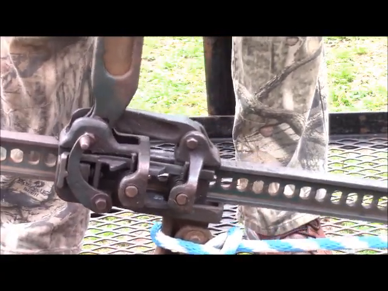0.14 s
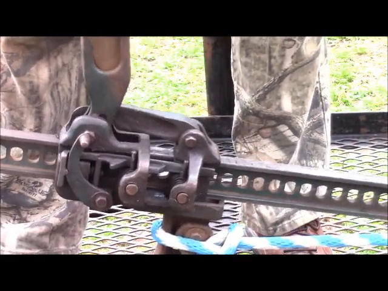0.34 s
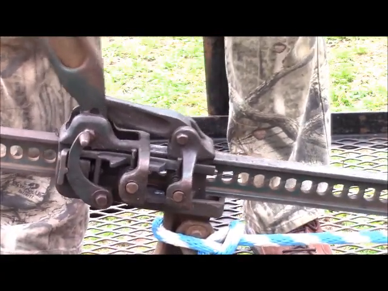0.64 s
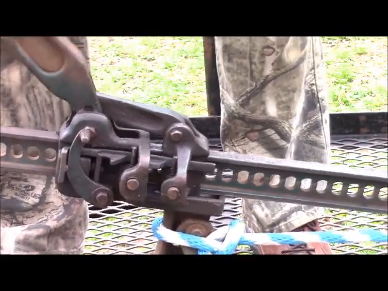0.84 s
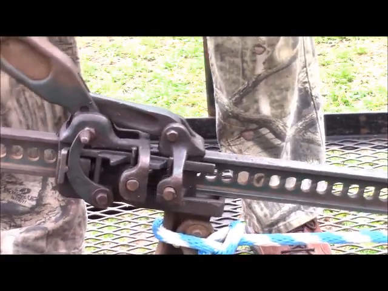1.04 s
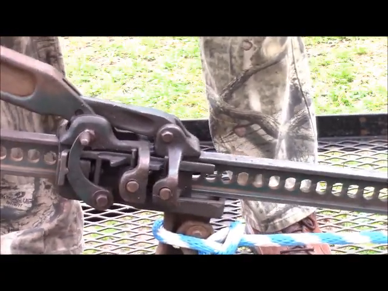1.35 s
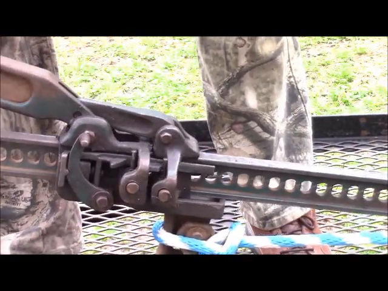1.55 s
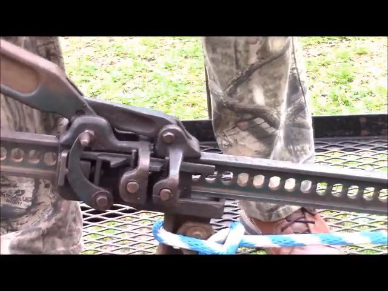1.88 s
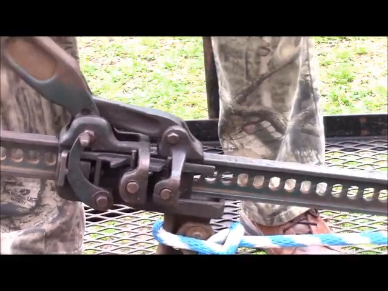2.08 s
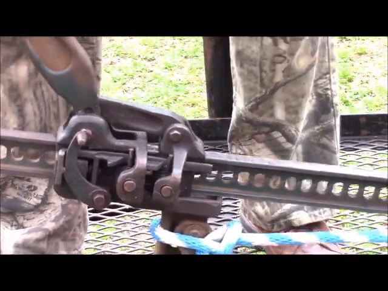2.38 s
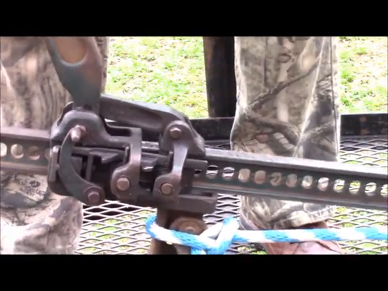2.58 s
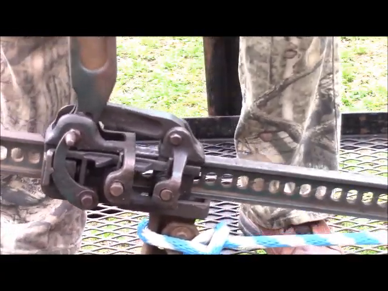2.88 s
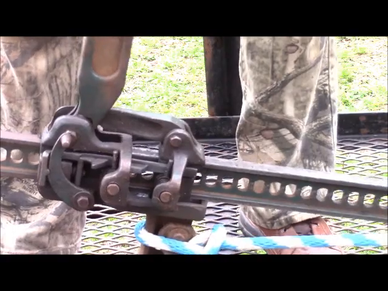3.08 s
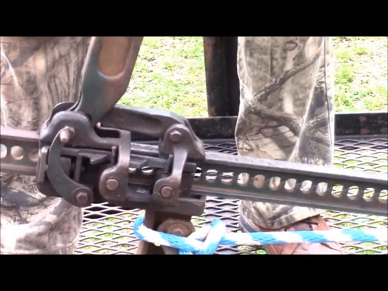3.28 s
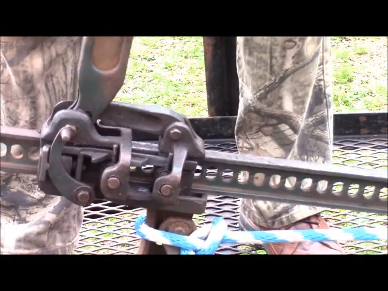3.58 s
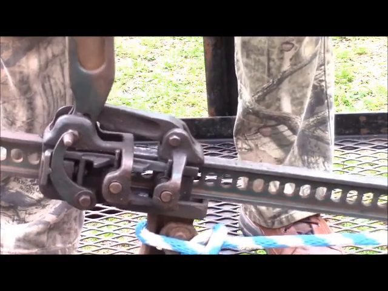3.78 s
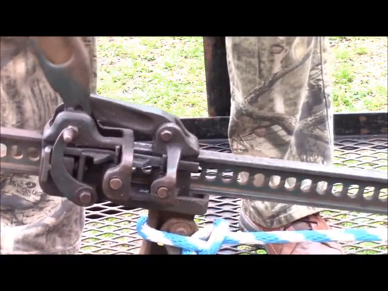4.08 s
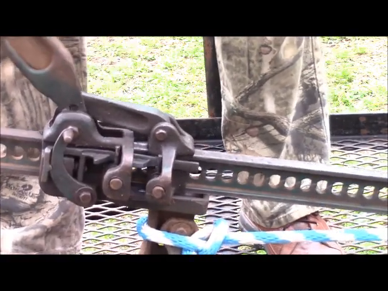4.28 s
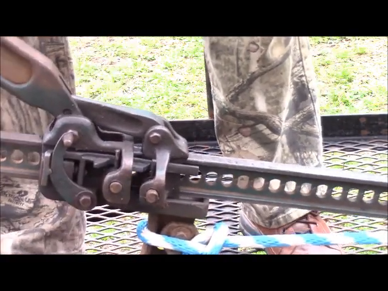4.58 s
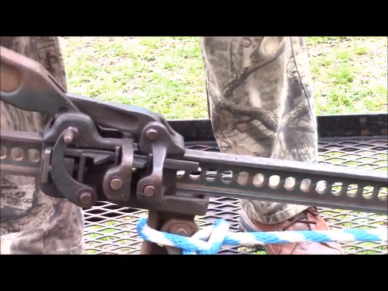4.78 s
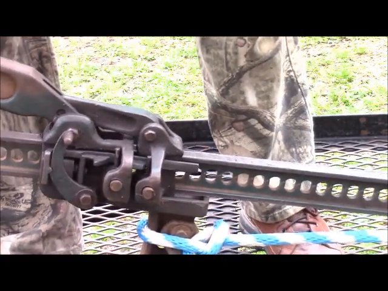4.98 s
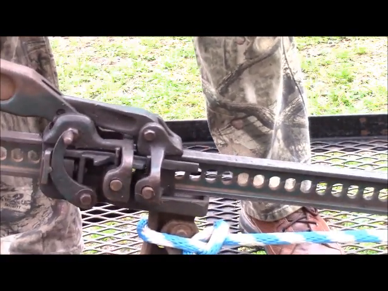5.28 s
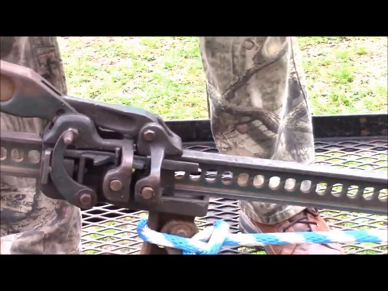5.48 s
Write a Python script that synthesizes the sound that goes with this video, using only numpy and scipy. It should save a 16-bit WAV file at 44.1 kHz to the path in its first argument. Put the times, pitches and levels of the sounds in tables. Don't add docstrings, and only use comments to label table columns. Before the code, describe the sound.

Loose cast-iron parts tick and clank as a lever is worked, close to the microphone. Three times a spring pin slams home with a tiny high ping, a steely clatter and a brief ringing bar, far louder than everything else. Between them are double clunks, soft rubbing, small chirps and low trailer thuds, over a very quiet open yard with distant air and a wavering engine hum.

```python
import sys
import numpy as np
from scipy import signal
from scipy.fft import rfft, irfft
from scipy.io import wavfile
from scipy.ndimage import uniform_filter1d

SR = 44100
rng = np.random.default_rng(int(sys.argv[2]) if len(sys.argv) > 2 else 0)


def log_audio(samples):
    frames = np.atleast_2d(samples).T
    limited = np.clip(frames, -1, 1)
    pcm = np.round(limited * 32767).astype(np.int16)
    wavfile.write(sys.argv[1], SR, pcm)


def ratio_of_db(decibels):
    return 10 ** (np.asarray(decibels, float) / 20)


N = 248724

# pitch_hz, density_db per Hz
YARD_COLOUR = [(16, -46.5), (80, -21), (135, -4), (393, -14.5), (1000, -18.5), (2000, -25), (14500, -43.5),
               (16500, -70)]
# pitch_hz, width_hz, level_db
ENGINE_LINES = [(134, 10, -68), (190, 13, -70.5), (261, 8.8, -77.5)]
# time_s, level_db
ENGINE_SWELL = [(0, -69), (.8, -62.5), (1.599, -74), (1.95, -69), (2.8, -74), (3.2, -66), (3.5, -73),
                (4.38, -68), (4.8, -75), (5.64, -74)]
# pitch_hz, side_re_mid_db
SIDE_COLOUR = [(25, -5.5), (60, -27), (150, -30.5), (400, -18), (3000, -15), (7000, -20), (13000, -21),
               (14500, -40.5)]

# start_s, level_db, t60_s
HEAVES = [
    (1.33, -48, 0.45),
    (3.015, -52, .1),
    (4.35, -51, 0.5),
]
# start_s, level_db
THUDS = [(0.853, -50.5), (1.25, -44), (1.337, -34), (1.459, -45.5), (1.89, -49), (1.948, -61),
         (2.225, -46.5), (3.017, -60), (3.718, -53), (4.35, -46.5), (4.4, -43.5), (4.439, -48)]
# pitch_hz, level_db, t60_s
DECK_MODES = [(61.95, -19.5, 0.32), (112, -6, 0.26), (148.3, -3, 0.29), (204, 2.5, 0.2), (223.4, -2, 0.31),
              (261, -5.5, 0.15), (331, -13, .4), (462, -8, 0.4), (560, -13.5, 0.17)]

# time_s, level_db
STRAIN = [(0, -63.5), (.35, -62.5), (.5, -64), (1.0, -61), (1.24, -60), (1.6, -65.5), (1.84, -54.5),
          (2.1, -59), (2.55, -61), (2.89, -66), (3.05, -65), (3.19, -56), (3.31, -65), (4.15, -64.5),
          (4.44, -55), (4.6, -68), (4.77, -57), (5.04, -65.5)]
# middle_s, length_s, level_db
SLIDES = [(.72, 0.42, -72.5), (1.0, 0.34, -74), (1.748, .16, -70.5), (1.828, 0.085, -69),
          (1.865, 0.073, -72), (1.902, 0.057, -65), (1.946, 0.05, -67), (2.02, .2, -74), (3.38, .25, -75),
          (2.548, .05, -65), (2.58, 0.048, -62), (2.62, 0.14, -68.5), (2.686, .05, -71.5),
          (3.17, .35, -70.5), (4.3, 1, -79), (4.95, 0.42, -73.5)]
# pitch_hz, density_db per Hz
RUB_COLOUR = [(120, -32), (200, 2.5), (500, -1.5), (602, -8), (1140, -10.5), (3500, -28), (4550, -53.5),
              (7700, -120)]
# pitch_hz, density_db per Hz
SCRAPE_COLOUR = [(1470, -29), (2500, -3), (3480, -4), (3800, -4.5), (4910, -10.5), (5530, -6.5),
                 (6830, -5.5), (15000, -27.5)]
# start_s, level_db, pitch_hz, glide_hz_per_s, t60_s
CHIRPS = [(4.355, -51, 1700, -1900, .4), (4.342, -63, 9100, 0, .09), (4.345, -62, 4300, 0, .1),
          (4.398, -59, 3650, 0, .05), (4.402, -63, 6400, 0, .11), (4.412, -61, 8300, 0, .1),
          (5.345, -60, 2900, 0, .04), (2.42, -62, 5250, 0, .2), (.987, -43, 1590, 0, .3),
          (.987, -51, 2300, 0, .18), (4.56, -53, 3050, 0, .2), (4.56, -52, 5300, 0, .13)]
# start_s, level_db, pitch_hz, glide_hz_per_s, t60_s
RAIL_HUMS = [(.99, -52, 441, 0, 0.83), (1.0, -52, 268, 0, 0.86), (3.69, -46.5, 268, 0.0083, 0.74),
             (4.562, -46.5, 436, 0, 0.6), (4.57, -54.5, 776, 0, 0.65), (2.23, -49.5, 268, 0, 0.41),
             (3.045, -47.5, 268, 0, 0.82), (3.06, -50, 429, 0, 0.8), (4.56, -49, 1331, 0, 0.24)]

# start_s, level_db, treble_re_body_db, body_hz
KNOCKS = [(0.169, -40.5, -9, 835), (0.657, -43.5, -22, 1410), (0.682, -42.5, -3, 2400),
          (0.695, -41, -6, 1700), (0.986, -31, -6.5, 1450), (1.24, -45, -20.5, 800),
          (1.332, -31.5, -35, 1487), (2.401, -38, -30.5, 2160), (3.677, -40, -10, 873),
          (3.714, -34.5, -20.5, 1496), (4.142, -46, -4.5, 1493), (4.559, -31.5, -5.5, 1420),
          (4.686, -47.5, -24, 1300)]
# start_s, level_db, treble_re_body_db, body_hz
CLUNKS = [(0.223, -40.5, -21, 1200), (1.698, -35, -12, 1200), (2.170, -35.5, -30.5, 1050),
          (2.212, -35.5, -23, 1003), (2.412, -42, 3, 2280), (4.341, -38, -19, 1530),
          (4.399, -46, -4.5, 900)]
# start_s, level_db, treble_re_body_db, body_hz
TICKS = [(0.194, -45, -23, 515), (0.641, -54, 1, 1340), (0.664, -42, 1, 1290), (0.834, -47.5, -26, 870),
         (0.93, -50, -22, 1300), (1.223, -41.5, -19, 566), (1.685, -44.5, -2.5, 2450),
         (1.894, -51, -3, 564), (1.938, -54, -2, 729), (2.443, -48, 0, 1500), (4.095, -47.5, -33, 1305),
         (4.116, -45, -19.5, 1200), (4.124, -51, -6, 1135), (4.258, -48, -17, 990), (5.345, -63, -21, 540),
         (5.552, -46, -30.5, 1520)]
# start_s, level_db, treble_re_body_db, body_hz
TAPS = [(1.2795, -39, -5, 3000), (1.670, -41, -24, 1100), (1.6735, -38, -30, 1200),
        (2.1795, -35, -34, 1100), (3.0095, -39, -12, 2900)]
# events, bass_re_body_db, damping_t60_s
KNOCK_KINDS = [(KNOCKS, -7.5, 0.72), (CLUNKS, -27, 0.34), (TICKS, -11.5, 0.12), (TAPS, -20, 0.083)]
# pitch_hz, level_db, t60_s
LINKAGE_MODES = [(268, -9.5, 8.6), (350, -18, 0.72), (438.4, -3, 0.34), (767, -10, 0.47), (1200, -13, 0.2),
                 (1324, -7, 0.16), (1600, -7, 0.12), (1645, -14, 0.35), (1857, -14, 0.047),
                 (2130, -4.5, 0.078), (2340, -17, 0.38), (2907, -18, 0.14), (3480, -20.5, 0.12),
                 (5110, -20, 0.12)]

# start_s, level_db, pitch_hz, t60_s
LONE_MODES = [(1.2795, -41, 3900, .015), (1.2795, -45, 5600, .015), (1.2893, -25, 3500, .014),
              (1.2935, -37, 3510, .05), (1.2935, -46, 13130, .04), (1.296, -31, 7500, .025),
              (1.2995, -31, 1700, .05), (1.311, -35, 2170, .04), (1.331, -34, 1500, .03),
              (3.0235, -21, 2300, .02), (3.0235, -22, 3200, .02), (3.0235, -24, 4700, .016),
              (3.0235, -26, 6000, .016), (3.0235, -29, 13100, .016), (3.029, -30, 6900, .05),
              (4.7836, -34, 3200, .013), (4.7855, -28, 4300, .02), (4.788, -32, 7100, .035),
              (4.792, -34, 800, .25), (4.795, -34, 5300, .05),
              (.2235, -42, 1800, .03), (.5, -66, 8800, .012), (.657, -45, 1250, .04),
                 (.664, -47, 5200, .02), (.664, -50, 3500, .02), (.664, -50, 7300, .02),
                 (.9858, -34, 1310, .035), (.9858, -35, 2290, .03), (.9858, -41, 3450, .03),
                 (.991, -36, 1620, .1), (.991, -40, 770, .1), (1.698, -38, 914, .03),
                 (1.698, -40, 1850, .04), (1.704, -42, 2200, .04), (1.882, -58, 6330, .03),
                 (1.9383, -56, 6200, .03), (2.171, -47, 2870, .065), (2.1712, -32, 1060, .014),
                 (2.1797, -37, 1600, .03), (2.2085, -42, 1550, .025), (2.2085, -58, 3250, .02),
                 (2.21, -55, 4050, .02), (2.224, -57, 3200, .02), (2.234, -49, 1650, .08),
                 (2.4433, -58, 14800, .005), (2.4433, -56, 9500, .005), (2.4433, -53, 3000, .05),
                 (3.677, -48, 2200, .04), (3.714, -37, 1233, .055), (3.714, -40, 1577, .065),
                 (3.714, -38, 1873, .06), (3.714, -49, 2842, .04), (3.714, -49, 3289, .04),
                 (3.712, -63, 8600, .025), (4.117, -48, 1200, .05), (4.1237, -55, 7400, .01),
                 (4.1421, -49, 3950, .02), (4.1421, -50, 2870, .03), (4.267, -57, 3530, .02),
                 (4.3435, -37, 1550, .025), (4.345, -52, 4200, .05), (4.361, -43, 1680, .04),
                 (4.412, -48, 480, .09), (4.418, -42, 210, .25), (4.5595, -39, 1350, .08),
                 (4.5595, -38, 1650, .09), (4.5595, -40, 1900, .07), (4.5595, -45, 3070, .08),
                 (4.694, -50, 1650, .06),
              (4.79, -63, 5475, 1.1), (4.79, -63, 3100, 1.3), (4.79, -62, 2121, .6), (4.80, -48, 267, .6),
           (4.86, -62, 8800, .1), (3.03, -58, 11750, .4), (3.03, -54, 12900, .15), (3.03, -59, 7050, .5),
           (3.03, -62, 8400, .4), (3.04, -45, 262, .6), (3.57, -66, 3080, .15), (1.30, -41, 5450, .1),
           (1.3, -46, 1633, .2), (1.339, -33, 230, .12), (1.339, -36, 480, .05), (1.345, -42, 110, .35),
           (4.36, -47, 105, .4),
              (.1695, -46, 2400, .015), (.189, -61, 5300, .015), (.1952, -39, 600, .02),
          (.2235, -40, 1050, .04), (.2215, -56, 2900, .015), (.231, -59, 3150, .03), (1.379, -41, 230, .2),
          (4.41, -45, 150, .25), (2.401, -54, 7100, .015), (3.7135, -38, 1000, .03),
          (3.7145, -47, 3600, .015), (3.6765, -48, 7000, .012), (4.095, -48, 1200, .04),
          (4.1145, -53, 2600, .015), (4.123, -50, 1200, .03), (4.1237, -56, 6200, .012),
          (4.148, -57, 6800, .04), (3.7145, -48, 4900, .012), (3.6765, -51, 8400, .012),
          (5.553, -52, 1550, .04), (5.553, -55, 2300, .03), (4.7835, -22, 7300, .01)]

# start_s, level_db, pitch_hz, t60_s
PINGS = [(1.2878, -18, 8940, 0.007), (1.2892, -5, 7670, 0.0048), (1.2908, -15, 7900, 0.008),
         (1.29, -18, 6400, .012), (2.4136, -32.5, 8080, 0.0045), (3.0201, -35.5, 8930, 0.008),
         (3.024, -9.5, 7100, 0.01), (3.0238, -10.5, 8400, 0.0095), (3.024, -14.5, 11720, 0.01472),
         (3.0234, -5, 8204, 0.004), (3.031, -20.5, 8100, 0.008), (4.7817, -19.5, 8700, 0.007),
         (4.7835, -3, 7900, 0.0038), (4.7851, -13.5, 8500, 0.009)]
# pitch_ratio, level_db
PIN_OVERTONES = [(.43, -28.5), (.72, -23.5), (1.12, -11), (1.361, -26), (1.62, -28), (1.899, -32.5)]
# start_s, clatter_db, ringing_db
SNAPS = [
    (1.29, -23.5, -27.5),
    (3.0232, -15.5, -24),
    (4.783, -19.5, -25.5),
]
# late_modes_db, diffuse_tail_db
AFTERGLOW = [(-46.5, -38), (-40, -31.5), (-49, -39.5)]
# pitch_hz, density_db per Hz
CLATTER_COLOURS = [
    [(88, -38.5), (150, -5.5), (1070, -8.5), (1650, -6.5), (4690, -8), (7080, -10.5), (13800, -21.5),
     (15500, -63.5)],
    [(88, -53.5), (300, -23.5), (980, -9.5), (2920, -6), (4080, -9.5), (6680, -9.5), (14500, -29.5),
     (16500, -74)],
    [(120, -61.5), (669, -20), (847, -6), (1070, -26), (2050, -8), (6940, -19.5), (14500, -35.5),
     (16500, -65)],
]
# pitch_hz, t60_s
CASTING_DECAY = [(150, 0.33), (500, 0.64), (1500, 0.26), (3000, .22), (6000, 0.2), (9000, 0.19),
                 (15000, 0.16)]
# pitch_hz, level_db, t60_s
REAR_RING = [(1534, -5, .16), (1633, -14, 0.19), (2180, -8, .2), (2890, -8.5, .13), (3420, -8, 0.19),
             (4436, -10, .1), (5195, -7, 0.13), (5400, -1, .11), (6175, -12, .15), (6920, -1.5, .085),
             (7359, -4, .1), (7860, -11.5, .12), (8550, -18, .13), (12630, -22, .14)]
# pitch_hz, level_db, t60_s
FRONT_RING = [(430, -18, .6), (915, -13, .5), (1147, -12, .4), (1626, -12, .19), (2090, -20, .4),
              (2266, -5, .16), (2417, -11, .22), (2890, -1, .14), (3085, -9, .15), (4506, -19, .23),
              (5184, -13, .14), (5475, -4, .085), (6826, -14, .17), (11810, -27, .22)]
# pitch_hz, level_db, t60_s
REAR_AGAIN_RING = [(880, -4, .3), (1147, -24, .4), (1346, -11, .25), (1534, -6, .2), (1949, -8, .15),
                   (2170, -18, .35), (3025, -4, .17), (3560, -9, .14), (3833, -16, .22), (4242, -10, .14),
                   (5200, -12, .17), (5530, -6, .1), (6503, -6.5, .1), (6971, -14, .17)]
# pitch_hz, level_db, t60_s
LATE_CLUSTERS = [
    [(3420, -9, .33), (5400, -4, .35), (7300, -1, .4), (12650, -8, .3)],
    [(2100, -2, .55), (3060, -5, .5), (4450, -7, .5), (7200, -7, .5), (8300, -9, .45), (11750, -14, .42)],
    [(2130, -4, .5), (3060, 0, .7), (5475, -4, .6), (7430, -9, .35)],
]


def evened(x):
    return x / np.sqrt(np.mean(x ** 2) + 1e-20)


def peaked(x):
    return x / (abs(x).max() + 1e-20)


def read(points, hz):
    f, value = np.transpose(points)
    return np.interp(np.log(hz + 1), np.log(f + 1), value, left=min(value[0], 1), right=value[-1])


def add(mix, start_s, sound):
    part = mix[round(start_s * SR):][:len(sound)]
    part += sound[:len(part)]


def coloured(x, points):
    gain = ratio_of_db(read(points, np.fft.rfftfreq(len(x), 1 / SR)))
    return evened(irfft(rfft(x) * gain, len(x)))


def resonance(hz, centre_hz, width_hz):
    return 1 / (1 + (2 * (hz - centre_hz) / width_hz) ** 2)


def onset(t, rise_s):
    return (1 - np.exp(-t / rise_s)) * np.minimum(1, 5 * (1 - t / t[-1]))


def ring(modes, t, chance, spread_db=0):
    hz, db, t60 = np.transpose(modes)[:, :, None]
    phase, size = chance[:len(hz), :1], chance[:len(hz), 1:]
    beat_hz = 0.021 * hz * (phase - size)
    beat = 1 + 0.73 * np.cos(2 * np.pi * (beat_hz * t + size))
    level = ratio_of_db(db + spread_db * (size - 0.5) - 60 * t / t60)
    return level * beat * np.sin(2 * np.pi * (hz * t + phase))


def cluster(modes, t):
    hz, db, t60 = np.transpose(modes)[:, :, None]
    noise = rng.standard_normal((len(modes), len(t)))
    width_hz = 0.05 * hz
    bands = irfft(rfft(noise) * resonance(np.fft.rfftfreq(len(t), 1 / SR), hz, width_hz), len(t))
    return (bands / bands.std(1, keepdims=True) * ratio_of_db(db - 60 * t / t60)).sum(0)


def clatter(t, noise, points, stretch):
    hz, s, z = signal.stft(noise, SR, nperseg=256)
    t60 = stretch * read(CASTING_DECAY, hz)[:, None]
    z = z * ratio_of_db(read(points, hz)[:, None] - 60 * s / t60)
    return signal.istft(z, SR, nperseg=256)[1][:len(t)]


def lumpy(noise):
    bins = len(noise) // 2 + 1
    lumps = evened(uniform_filter1d(rng.standard_normal(bins), size=int(80 * len(noise) / SR)))
    return irfft(rfft(noise) * ratio_of_db(3 * lumps), len(noise))


def far_engine():
    out, hz = np.zeros(N), np.fft.rfftfreq(N, 1 / SR)
    s, swell_db = np.transpose(ENGINE_SWELL)
    load = ratio_of_db(np.interp(np.arange(N) / SR, s, swell_db - np.mean(swell_db)))
    for (line_hz, width_hz, db), swell in zip(ENGINE_LINES, (1, load, 1)):
        line = irfft(rfft(rng.standard_normal(N)) * resonance(hz, line_hz, width_hz), N)
        out += ratio_of_db(db) * swell * evened(line)
    return out


def yard():
    frames, hz = N // 256 + 5, np.fft.rfftfreq(1024, 1 / SR)
    a, b, patches = rng.standard_normal((frames, 513, 3)).T
    patches = uniform_filter1d(patches, 10, 0)
    patches = evened(uniform_filter1d(patches, 14, 1))
    z = (a + 1j * b) * ratio_of_db(read(YARD_COLOUR, hz)[:, None] + 0.98 * patches)
    wash = evened(signal.istft(z, nperseg=1024, noverlap=768)[1][:N])
    return ratio_of_db(-62) * wash + far_engine()


def heaves():
    t, level = np.arange(30000) / SR, np.zeros(N)
    for s, db, t60 in HEAVES:
        swell = onset(t, 0.055 * t60) ** 2 * ratio_of_db(-60 * t / t60)
        add(level, s, ratio_of_db(db) * peaked(swell))
    rumble = [(15, -40.5), (35, -17.5), (60, -9), (110, 0.5), (200, -2), (300, -30), (800, -80.5)]
    return level * coloured(rng.standard_normal(N), rumble)


def thuds():
    out, t = np.zeros(N), np.arange(20000) / SR
    for s, db in THUDS:
        boom = ring(DECK_MODES, t, rng.random((len(DECK_MODES), 2)), spread_db=7.5).sum(0)
        add(out, s, ratio_of_db(db) * peaked(boom * onset(t, 0.018)))
    return out


def rubbing():
    t, out = np.arange(N) / SR, np.zeros(N)
    strain = ratio_of_db(np.interp(t, *np.transpose(STRAIN)))
    strain = np.sqrt(np.maximum(strain ** 2 - ratio_of_db(-66) ** 2, 0))
    slide = np.zeros(N)
    for middle_s, length_s, db in SLIDES:
        slide += ratio_of_db(db) * np.cos(np.pi * np.clip((t - middle_s) / length_s, -0.5, 0.5))
    for level, colour, slips_per_s in ((strain, RUB_COLOUR, 3000), (slide, SCRAPE_COLOUR, 5000)):
        force = ratio_of_db(1.5 * np.minimum(rng.exponential(1, N), 3))
        slips = force * rng.standard_normal(N) * (rng.random(N) < slips_per_s / SR)
        out += level * coloured(slips, colour)
    return out


def chirps():
    out, t = np.zeros(N), np.arange(16000) / SR
    for s, db, hz, glide, t60 in CHIRPS + RAIL_HUMS:
        grip = 0.7 + evened(uniform_filter1d(rng.standard_normal(len(t)), size=int(8 * SR / hz)))
        tone = np.sin(2 * np.pi * (hz * t + glide * t ** 2 / 2))
        add(out, s, ratio_of_db(db - 60 * t / t60) * grip * tone * onset(t, 0.00094))
    return out


def knock(t, treble_db, body_hz, bass_db, damping_t60):
    noise, chance = rng.standard_normal((3, len(t))), rng.random((len(LINKAGE_MODES), 2))
    modes = ring(LINKAGE_MODES, t, chance, spread_db=8.5)
    mode_hz = np.transpose(LINKAGE_MODES)[0]
    damping_db = -60 * t / damping_t60
    crisp = 1 + 0.98 * np.exp(-t / 0.004)

    body = [(body_hz / 5, -40), (body_hz / 3.2, -9), (body_hz, 0), (body_hz * 1.87, -10),
            (body_hz * 5.4, -35), (16000, -80)]
    mid = peaked(clatter(t, noise[0], body, 1.456) * crisp * onset(t, 0.00075) * ratio_of_db(damping_db))
    lines = ratio_of_db(0.42 * read(body, mode_hz)) @ modes
    mid += ratio_of_db(-4) * peaked(lines * onset(t, 0.0016) * ratio_of_db(0.55 * damping_db))

    treble = [(1500, -40), (3500, 6), (7000, 3.5), (11000, -12.5), (16000, -24.5)]
    high = peaked(clatter(t, noise[1], treble, 0.45) * crisp * onset(t, 0.0002))
    high_modes = [mode for mode in LINKAGE_MODES if mode[0] > 2700]
    high += min(damping_t60, 0.4) * peaked(cluster(high_modes, t) * onset(t, 0.0005))

    bass = [(80, -41.5), (200, -1), (450, -5), (900, -27), (3000, -71)]
    low = peaked(clatter(t, noise[2], bass, 0.45)) + peaked((mode_hz < 600) @ modes)

    sound = peaked(mid) + ratio_of_db(treble_db + 0.3 * damping_db) * peaked(high)
    return sound + ratio_of_db(bass_db - 60 * t / 0.19) * low * onset(t, 0.0069)


def knocks():
    out, t = np.zeros(N), np.arange(12000) / SR
    for events, bass_db, damping_t60 in KNOCK_KINDS:
        for s, db, treble_db, body_hz in events:
            add(out, s, ratio_of_db(db) * knock(t, treble_db, body_hz, bass_db, damping_t60))
    return out


def blows():
    out, t = np.zeros(N), np.arange(20000) / SR
    for s, db, hz, t60 in LONE_MODES:
        waver = 1 + 0.3 * np.cos(2 * np.pi * 0.03 * hz * t)
        tone = ratio_of_db(-60 * t / t60) * waver * np.sin(2 * np.pi * hz * t)
        add(out, s, ratio_of_db(db) * peaked(tone * onset(t, 0.0006)))
    return out


def pin_pings():
    out, t = np.zeros(N), np.arange(1000) / SR
    for s, db, hz, t60 in PINGS:
        modes = [(hz, 0, t60)] + [(hz * ratio, over_db, t60) for ratio, over_db in PIN_OVERTONES]
        ping = ring(modes, t, rng.random((len(modes), 2))).sum(0)
        add(out, s, ratio_of_db(db) * peaked(ping * onset(t, 0.00026)))
    return out


def bar_snaps():
    out, t = np.zeros(N), np.arange(30000) / SR
    rings = (REAR_RING, FRONT_RING, REAR_AGAIN_RING)
    grip = [SR, SR, 0.6]
    for snap, modes, colour, clusters, glow in zip(SNAPS, rings, CLATTER_COLOURS, LATE_CLUSTERS, AFTERGLOW):
        (s, clatter_db, ring_db), (late_db, tail_db) = snap, glow
        dense = clatter(t, lumpy(rng.standard_normal(len(t))), colour, 0.77) * onset(t, 0.00077)
        tail = clatter(t, rng.standard_normal(len(t)), colour, 1.9) * onset(t, 0.006)
        lines = ring(np.minimum(modes, grip), t, rng.random((len(modes), 2))).sum(0) * onset(t, 0.0098)
        late = cluster(clusters, t) * onset(t, 0.0044)
        sound = ratio_of_db(clatter_db) * peaked(dense) + ratio_of_db(ring_db) * peaked(lines)
        sound += ratio_of_db(late_db) * peaked(late) + ratio_of_db(tail_db) * peaked(tail)
        add(out, s, sound)
    return out


def scene():
    low_cut = signal.butter(3, 140, "highpass", fs=SR, output="sos")
    small_parts = signal.sosfilt(low_cut, pin_pings() + bar_snaps() + knocks() + blows())
    steel = small_parts + thuds() + heaves() + chirps() + rubbing()

    t = np.arange(6000) / SR
    smear = rng.standard_normal(len(t)) * ratio_of_db(-60 * t / 0.11)
    side = ratio_of_db(-28) * signal.oaconvolve(steel, smear / np.linalg.norm(smear))[:N]
    side = signal.lfilter([1, -0.45], 1, side)
    mid = steel + yard()
    side = side + ratio_of_db(-20) * yard()
    side = irfft(rfft(side) * ratio_of_db(read(SIDE_COLOUR, np.fft.rfftfreq(N, 1 / SR)) + 29), N)
    return np.array([mid * ratio_of_db(-0.08) + side, mid * ratio_of_db(-0.25) - side])


def roll_off(x):
    return signal.sosfilt(signal.butter(12, 16660, fs=SR, output="sos"), x)


def record(dry):
    soft = 0.62 * np.tanh(dry / 0.62)
    band_limit = signal.firwin(301, 16500, window=("kaiser", 9), fs=SR)
    limited = signal.oaconvolve(soft, band_limit[None], "same")
    return roll_off(limited)


dry = scene()
out = record(dry)
log_audio(out)
```